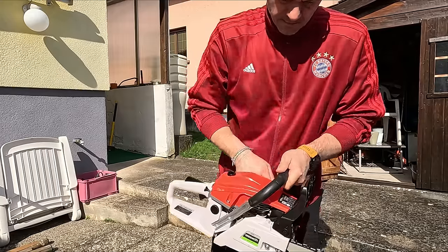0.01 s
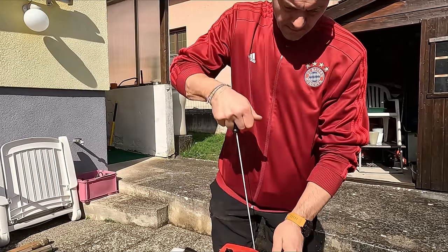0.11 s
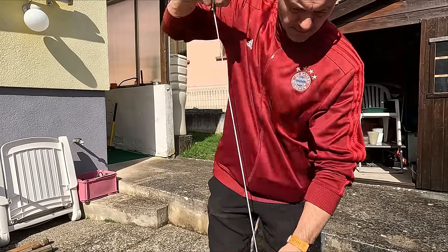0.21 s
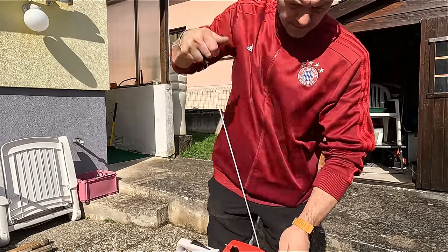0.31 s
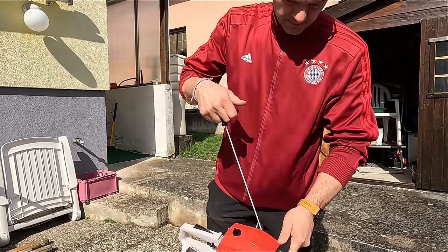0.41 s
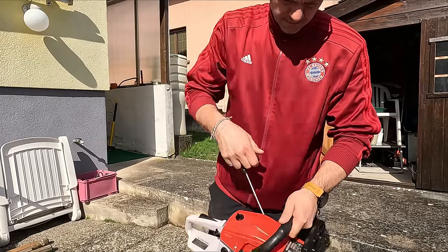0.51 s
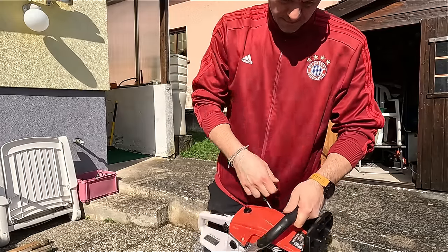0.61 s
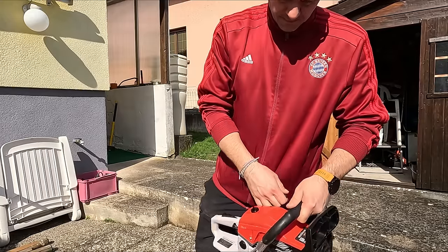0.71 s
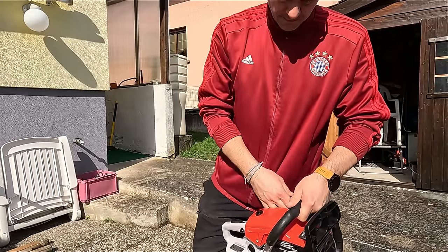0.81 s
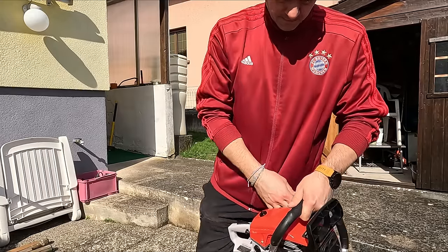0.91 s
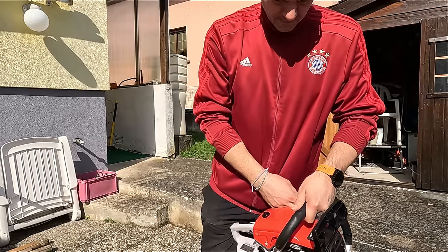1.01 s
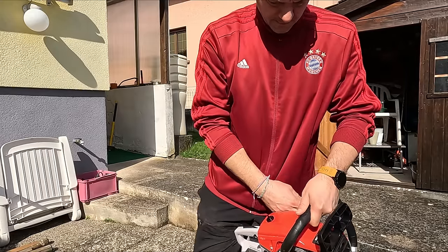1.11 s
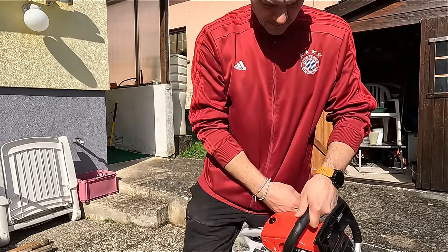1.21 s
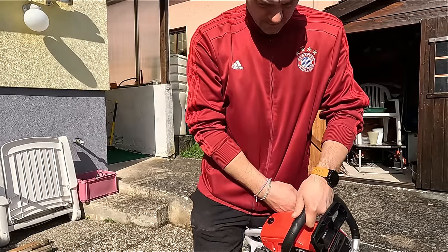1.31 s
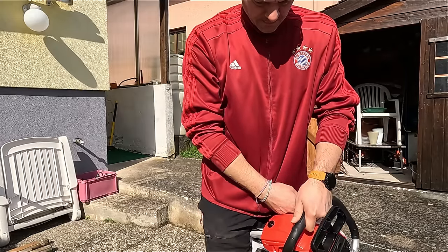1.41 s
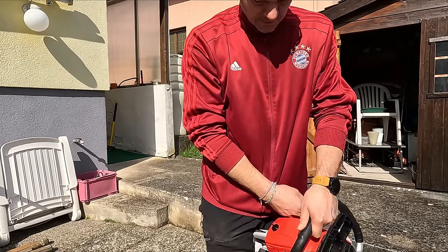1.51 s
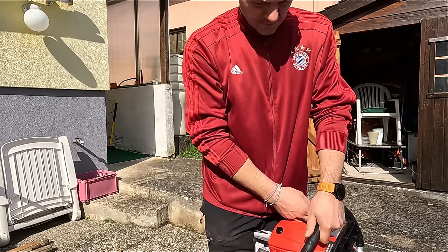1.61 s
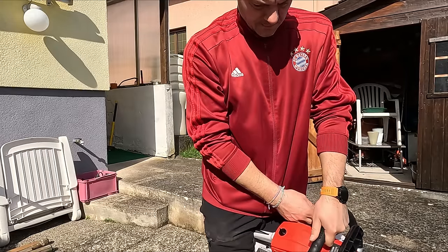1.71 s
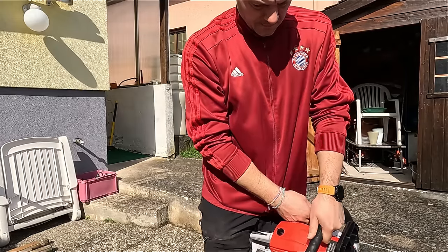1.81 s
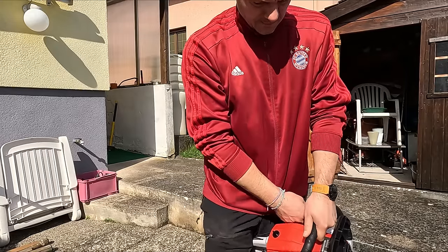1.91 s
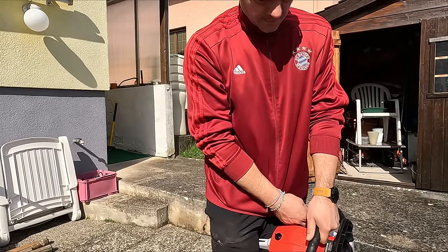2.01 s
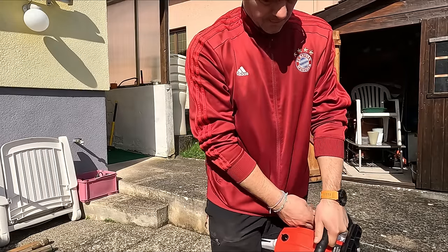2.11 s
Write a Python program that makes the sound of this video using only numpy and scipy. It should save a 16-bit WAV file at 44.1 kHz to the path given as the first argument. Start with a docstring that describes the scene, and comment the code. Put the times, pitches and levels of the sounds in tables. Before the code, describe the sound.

A chainsaw's starter cord is pulled once, close by in a yard. Light clacks lead into a whirr, and from 0.2 to 0.5 seconds the engine gives quick hollow puffs without catching. The cord rewinds until about 0.9 seconds while the plastic housing clacks and the chain chinks. Afterwards sleeves rustle faintly and a light breeze rumbles on the microphone. A small lever clicks at around 2 seconds.

```python
"""A light clack and the whirr of a cord: one pull on a chainsaw's starter in a yard. The piston pushes
a few hollow puffs through the ringing muffler, and the engine stops without catching. The spring winds
the cord back while the plastic housing clacks and the loose chain chinks on its steel bar.
Then sleeves rustle, a lever on the handle clicks, and a breeze rumbles on the microphone."""
import sys
import numpy as np
from scipy import signal
from scipy.fft import rfft, irfft, next_fast_len
from scipy.io import wavfile

SR = 44100
rng = np.random.default_rng(int(sys.argv[2]) if len(sys.argv) > 2 else 0)


def materialize(psi):
    """Save the field psi as 16-bit PCM at rate SR to the path in sys.argv[1].

    A 1-D psi becomes a single channel; in a 2-D psi each row is a channel.
    """
    bounded = np.clip(np.atleast_2d(psi).T, -1, 1)
    quanta = np.round(bounded * 32767).astype(np.int16)
    wavfile.write(sys.argv[1], SR, quanta)


N = 97020

# piston strokes (time [s], level [dB], pitch [Hz])
PUFFS = [(.209, -24.5, 523), (0.2307, -11.5, 263), (0.2617, -2, 232.6), (0.2897, -3, 239),
         (0.3142, -4, 247), (0.344, -4, 213.7), (0.3901, -8, 190.4), (0.409, -15, 205), (.4470, -11, 230.5),
         (.4870, -15.5, 104.6)]
# muffler ring (multiple of the pitch, level [dB], t60 [s])
MUFFLER_MODES = [(.57, -13.5, 0.12), (1, 1.5, 0.064), (1.17, -10.5, 0.081), (1.6, -14.5, 0.13),
                 (2.05, -7.5, 0.046), (3.3, -16.5, 0.019)]
# breath of escaping gas (frequency [Hz], level [dB])
GAS_EQ = [(60, -30), (160, -24), (320, 26), (550, 3), (900, -1), (2000, -65), (6000, -64)]
# the saw rocking in the hands (time [s], level [dB])
ROCK_ENV = [(.2, -67), (.33, -35), (.41, -26), (.5, -32), (.62, -33.5), (.68, -56), (.8, -74)]
# its low thud (frequency [Hz], level [dB])
ROCK_EQ = [(20, -13), (45, 6.5), (70, 9), (125, 3), (200, -6), (500, -46)]

# cord and pulley running (time [s], level [dB], treble lift and bass cut [dB])
WHIRR_ENV = [(0, -27.5, 2.5), (.05, -59, -18), (.095, -51, 3.5), (.16, -72, -8), (.19, -32, -6),
             (.23, -23.5, -5), (.27, -21.5, -0.5), (.33, -22.5, 1.5), (.37, -21, -2), (.395, -19, 3),
             (.43, -25.5, -5), (.48, -33.5, -5.5), (.53, -27.5, -4.5), (.6, -30.5, -1.5), (.69, -34.5, 3),
             (.74, -35.5, -7), (.785, -45.5, 1.5), (.88, -61, 0)]
# their friction (frequency [Hz], level [dB])
CORD_EQ = [(150, -9), (420, -12.5), (580, 6), (1000, -4), (1600, 3.5), (2700, -0.5), (4000, 0), (5800, -7),
           (8300, -9), (9600, -20.5), (12500, -30), (15500, -63)]
# the cord rubbing in its eyelet (time [s], level [dB])
RASP_ENV = [(.19, -55), (.225, -25), (.26, -22), (.3, -29.5), (.35, -35.5), (.45, -68)]
# its narrow rasp (frequency [Hz], level [dB])
RASP_EQ = [(1200, -31), (2000, 1), (2700, 4), (3200, -4), (4200, -41)]
# drone of the returning pulley (time [s], level [dB])
REWIND_ENV = [(.45, -61), (.52, -52), (.62, -33.5), (.72, -40.5), (.77, -66), (.83, -42), (.87, -62.5)]
# hollow starter cover (frequency [Hz], width [Hz], gain [dB])
COVER_MODES = [(600, 72, -6.5), (752, 120, -1), (1155, 45, -6)]

# knocks of starter and housing (time [s], level [dB], centre [Hz], t60 [s])
CLACKS = [(.0005, -34, 1480, 0.12), (0.1056, -16, 1660, .028), (0.113, -23, 5600, 0.046),
          (.1210, -21, 1710, 0.034), (0.169, -15, 2380, 0.029), (.179, -14.5, 2300, 0.022),
          (0.204, -20, 2700, 0.021), (0.239, -12.5, 2420, 0.0082), (0.2572, -13, 2510, 0.027),
          (0.281, -10.5, 2880, 0.01), (.3115, -14.5, 6760, 0.099), (0.3336, -14, 1660, 0.057),
          (0.3399, -11.5, 6600, 0.022), (0.3469, -14.5, 3770, 0.021), (0.3924, -11, 6940, 0.026),
          (0.4098, -11, 4200, 0.017), (.4215, -28, 7300, 0.077), (.5266, -16.5, 1760, 0.034),
          (.5434, -16, 1120, .04), (0.569, -22.5, 1830, 0.039), (.5968, -19.5, 1700, .035),
          (.6290, -18.5, 1400, 0.028), (.6660, -20.5, 1080, 0.05), (0.666, -21.5, 5800, 0.035),
          (0.7135, -24.5, 1410, 0.014), (.7160, -20.5, 5940, 0.034), (.7980, -19.5, 2940, 0.05),
          (0.8096, -20.5, 3330, 0.039)]
# tone of knocked plastic (frequency [Hz], level [dB])
PLASTIC_EQ = [(100, -21), (400, -18), (700, 8.5), (1500, 1), (3200, 4), (5000, -6), (8500, -10.5),
              (11000, -34), (15000, -44)]
# body of the housing (frequency [Hz], width [Hz], gain [dB])
HOUSING_MODES = [(584, 35, -5.5), (748, 14, 3), (1102, 38, 5), (1482, 19, 0), (1770, 130, -13),
                 (2190, 54, -12), (2600, 54, -11), (2790, 13, -25), (3320, 115, -3)]

# loose chain hitting the bar (time [s], level [dB], tilt [dB/octave], boosted frequency [Hz])
CHINKS = [(.0005, -31.5, 2.5, 5240), (0.11, -25.5, -2, 11000), (0.177, -22.5, -2.5, 5165),
          (0.384, -11.5, -7, 4230), (0.4195, -16, -12, 4140), (.5050, -34.5, -1, 10850),
          (.5270, -31, 14, 7885), (0.547, -34, 4, 8450), (.5695, -28, 1, 7760), (.5760, -31, 2, 4352),
          (0.63, -25, -1.5, 4300), (.6680, -24, -3, 4470), (.7200, -20.5, -4, 4490),
          (.7260, -26, -3.5, 5165), (0.811, -28, -3, 8280)]
# ring of the steel bar (frequency [Hz], level [dB], t60 [s])
BAR_MODES = [(3620, -11, .15), (3838, -10, .16), (4240, -4, .06), (4350, 3, .09), (4673, -10, .09),
             (5174, -2, .055), (7050, -8, .045), (7885, -4, .085), (8748, -14, .11), (9055, -14, .12),
             (10240, -21, .09), (10620, -17, .08), (10770, -15, .1), (11010, -21, .09), (13300, -26, .08)]
# the chain shivering (time [s], level [dB])
JINGLE_ENV = [(.36, -70), (.39, -24), (.43, -25), (.47, -54), (.54, -31.5), (.59, -30), (.65, -36),
              (.76, -75)]

# lever contacts (time [s], level [dB], t60 [s], hollow ring [dB])
CLICKS = [(0.9356, -41.5, 0.018, -8), (0.961, -45, 0.057, 5.5), (1.9870, -26, 0.013, -25),
          (1.9964, -33, 0.021, -7), (2.001, -31.5, 0.057, 3), (2.0745, -33.5, 0.015, -8),
          (2.0890, -34, 0.069, -17), (2.0990, -36.5, 0.032, -23)]
# tone of the lever's snap (frequency [Hz], level [dB])
LEVER_EQ = [(200, -10), (800, -3.5), (1600, -3), (2600, 4), (3100, 1.5), (4300, -17), (9000, -18.5),
            (14000, -52)]
# its hollow ring (frequency [Hz], width [Hz], gain [dB])
LEVER_MODES = [(1186, 28, 0)]

# sleeves rustling (time [s], level [dB])
SLEEVE_ENV = [(0, -46), (.9, -56.5), (.98, -56.5), (1.1, -49), (1.19, -57.5), (1.24, -49.5), (1.28, -46.5),
              (1.4, -51.5), (1.53, -48), (1.58, -56), (1.76, -54.5), (1.82, -50.5), (1.88, -56.5),
              (1.95, -46), (2.02, -47), (2.2, -48.5)]
# tone of the cloth (frequency [Hz], level [dB])
SLEEVE_EQ = [(300, -23), (1200, 9.5), (3000, 6), (6000, -3), (8700, -6.5), (10000, -25), (13000, -25),
             (15500, -50)]
# quick sleeve strokes (time [s], level [dB], half length [s])
SWISHES = [(0.982, -54, 0.03), (1.057, -60, 0.018), (1.233, -47.5, 0.017), (1.34, -56.5, 0.036),
           (1.512, -56, 0.022)]
# their hiss (frequency [Hz], level [dB])
SWISH_EQ = [(1000, -11), (3500, -7), (5300, -1.5), (8500, -8), (10000, -18), (13000, -29), (15500, -34)]
# gusts (time [s], level [dB])
BREEZE_ENV = [(0.68, -39.5), (0.688, -49), (0.856, -35), (0.916, -46), (0.976, -37.5), (1.25, -47),
              (1.326, -41.5), (1.37, -49), (1.446, -28), (1.572, -38.5), (1.742, -32.5), (1.784, -45.5),
              (1.894, -31.5), (1.984, -47), (1.988, -50), (2.114, -39), (2.182, -34.5), (2.2, -61)]
# their rumble (frequency [Hz], level [dB])
BREEZE_EQ = [(12, -5), (28, 0), (60, -6), (100, -11), (180, -30.5), (400, -71), (1500, -75)]
# open-air bed (time [s], level [dB])
AIR_ENV = [(0, -47), (.9, -54), (1.4, -48), (1.85, -48), (2.2, -45)]
# its tone (frequency [Hz], level [dB])
AIR_EQ = [(60, -5), (150, 2), (300, -5), (450, -6.5), (700, -6.5), (1200, -5.5), (1700, -12), (2700, -46),
          (7200, -31.5), (10000, -38.5), (15000, -62)]

# stereo image of the background (frequency [Hz], left-right correlation)
CORRELATION = [(30, 0.68), (120, 1), (1000, 0.57), (4000, 0.8), (9000, 1), (13000, 1)]
# reflections off near surfaces (frequency [Hz], side level [dB])
SIDE_EQ = [(100, -51), (250, -61), (600, -26), (1200, -19), (2500, -19.5), (5000, -13), (9000, -67),
           (13000, -17)]
# tail from the walls (frequency [Hz], t60 [s])
WALL_DECAY = [(150, 0.049), (700, 0.55), (3000, 0.14), (10000, 0.052)]
# pan (frequency [Hz], left minus right [dB])
BALANCE = [(60, -0.7), (250, -1.1), (800, -0.4), (4000, -1.1), (8000, -0.8), (12000, 3)]
# phase between the sides (frequency [Hz], lag of the left [rad])
LEFT_LAG = [(200, 0.26), (1000, 0.08), (2500, 0.45), (4300, 0.73), (8000, 0.32), (12000, 1)]


def amp(db):
    """Decibels to gain."""
    return 10 ** (np.asarray(db) / 20)


def unit(x):
    """Scale to rms 1."""
    return x / np.sqrt(np.mean(x ** 2) + 1e-20)


def along(points, hz):
    """Read (frequency, value) points on a log axis."""
    f, v = np.transpose(points)
    return np.interp(np.log(hz + 1), np.log(f + 1), v)


def curves(rows):
    """One value per sample for each column after the time."""
    times, *columns = np.transpose(rows)
    return [np.interp(np.arange(N) / SR, times, column) for column in columns]


def fader(rows):
    """Gain per sample from (time, level) points."""
    return amp(curves(rows)[0])


def fade(t, t60):
    """Exponential decay, 60 dB down at t60."""
    return np.exp(-np.log(1000) * t / t60)


def rise(t, attack_s):
    """Exponential attack."""
    return 1 - np.exp(-t / attack_s)


def bell(offset, width):
    """Gaussian bump of height 1."""
    return np.exp(-.5 * (offset / width) ** 2)


def add(track, s, sound):
    """Mix a sound into the track at time s."""
    i = max(0, round(s * SR))
    track[i:i + len(sound)] += sound[:N - i]


def filtered(x, response):
    """Apply a frequency response."""
    size = next_fast_len(x.shape[-1] + SR // 8)
    hz = np.fft.rfftfreq(size, 1 / SR)
    return irfft(rfft(x, size) * response(hz), size)[..., :x.shape[-1]]


def equalise(x, eq):
    """Apply a (frequency, level) curve."""
    return filtered(x, lambda hz: amp(along(eq, hz)))


def noise(eq, size=N):
    """Coloured noise of rms 1."""
    return unit(equalise(rng.standard_normal(size), eq))


def wide_noise(eq):
    """Coloured stereo noise whose width varies with frequency."""
    def mid_side(hz):
        angle = np.arccos(along(CORRELATION, hz)) / 2
        return amp(along(eq, hz)) * [np.cos(angle), np.sin(angle)]
    mid, side = filtered(rng.standard_normal((2, N)), mid_side)
    return unit(np.array([mid + side, mid - side]))


def resonate(x, modes):
    """Pass x through parallel band-pass resonators."""
    return filtered(x, lambda hz: sum(amp(db) * 1j * hz * width / (centre**2 - hz**2 + 1j * hz * width)
                                      for centre, width, db in modes))


def ringing(hz, level_db, t60, t):
    """Decaying modes that start at rms 1 together."""
    gain = amp(level_db)
    waves = fade(t, t60) * np.sin(2 * np.pi * (hz * t + rng.random(hz.shape)))
    return np.sqrt(2) * (gain / np.linalg.norm(gain) * waves).sum(0)


def engine(gas_db=-9, gas_lead_s=.003, low_cut_hz=128):
    """Each piston stroke pushes a puff of gas through the ringing muffler; the saw rocks underneath."""
    puffs, t = np.zeros(N), np.arange(SR // 5) / SR
    for s, db, hz in PUFFS:
        ring = sum(amp(level) * fade(t, t60) * np.sin(2 * np.pi * hz * ratio * t)
                   for ratio, level, t60 in MUFFLER_MODES)
        add(puffs, s, amp(db) * ring * rise(t, attack_s=.00038))
        gas = noise(GAS_EQ, len(t)) * fade(t, t60=.055) * rise(t, gas_lead_s)
        add(puffs, s - gas_lead_s, amp(db + gas_db) * gas)
    low_cut = signal.butter(2, low_cut_hz, "highpass", fs=SR, output="sos")
    return signal.sosfilt(low_cut, puffs) + fader(ROCK_ENV) * noise(ROCK_EQ)


def starter(ticks_per_s=550, tick_share=.45, pivot_hz=2500):
    """Cord and pulley rub and tick, brighter when running fast; the cord rasps in its eyelet."""
    level_db, tilt_db = curves(WHIRR_ENV)
    ticks = unit((rng.random(N) < ticks_per_s / SR) * rng.choice([-1, 1], N))
    friction = np.sqrt(tick_share) * ticks + np.sqrt(1 - tick_share) * rng.standard_normal(N)
    rub = unit(equalise(friction, CORD_EQ))
    lows = filtered(rub, lambda hz: 1 / (1 + (hz / pivot_hz) ** 2))
    whirr = lows * amp(-tilt_db) + (rub - lows) * amp(tilt_db)
    return amp(level_db) * whirr + fader(RASP_ENV) * noise(RASP_EQ)


def rewind():
    """The spring winds the cord in, and the pulley drones in the hollow starter cover."""
    return fader(REWIND_ENV) * unit(resonate(noise(CORD_EQ), COVER_MODES))


def clacks(peak_db=12.5, peak_octaves=.23):
    """Plastic parts knock: short noise bursts, each with one broad resonance."""
    out, t = np.zeros(N), np.arange(SR // 8) / SR
    for s, db, centre, t60 in CLACKS:
        def colour(hz):
            peak = peak_db * bell(np.log2((hz + 1) / centre), peak_octaves)
            return amp(along(PLASTIC_EQ, hz) + peak)
        burst = unit(filtered(rng.standard_normal(len(t)), colour))
        add(out, s, amp(db) * burst * fade(t, t60) * rise(t, attack_s=.00013))
    return out


def housing(x, trim_db=-3):
    """Whatever knocks or rubs on the plastic housing rings its resonances."""
    return amp(trim_db) * (x + resonate(x, HOUSING_MODES))


def chinks(boost_db=14.5, boost_octaves=.035, scatter_db=3, link_db=-9.5, link_db_per_octave=-5.5):
    """Each knock rings the steel bar, one narrow band boosted, and chain links at chance pitches."""
    out, t = np.zeros(N), np.arange(SR // 5) / SR
    hz, level, t60 = np.transpose(BAR_MODES)[:, :, None]
    for s, db, tilt, boosted_hz in CHINKS:
        mode_db = level + tilt * np.log2(hz / hz.mean())
        mode_db += boost_db * bell(np.log2(hz / boosted_hz), boost_octaves)
        mode_db += scatter_db * rng.standard_normal(hz.shape)
        bar = ringing(hz, mode_db, t60, t)
        link_hz = rng.uniform(3200, 14000, size=(40, 1))
        slope_db = (link_db_per_octave + tilt) * np.log2(link_hz / hz.mean())
        links = ringing(link_hz, slope_db, t60=.1, t=t)
        add(out, s, amp(db) * (bar + amp(link_db) * links) * rise(t, attack_s=.0013))
    return out


def jingle(contacts_per_s=450):
    """The chain shivers on the bar: many light contacts keep the steel ringing between the knocks."""
    hz, level, t60 = np.transpose(BAR_MODES)[:, :, None]
    ring = ringing(hz, level, t60, np.arange(SR // 5) / SR)
    contacts = unit((rng.random(N) < contacts_per_s / SR) * rng.standard_normal(N))
    return signal.fftconvolve(fader(JINGLE_ENV) * contacts, ring / np.linalg.norm(ring))[:N]


def lever():
    """A small lever on the handle snaps over and settles; some contacts ring hollow."""
    out, t = np.zeros(N), np.arange(SR // 8) / SR
    for s, db, t60, hollow_db in CLICKS:
        snap = noise(LEVER_EQ, len(t))
        hollow = amp(hollow_db) * unit(resonate(snap, LEVER_MODES))
        add(out, s, amp(db) * (snap + hollow) * fade(t, t60) * rise(t, attack_s=.000075))
    return out


def sleeves():
    """Cloth rubs in a soft rustle with a few quick swishes."""
    t = np.arange(N) / SR
    strokes = sum(amp(db) * bell(t - s, half_length) for s, db, half_length in SWISHES)
    return fader(SLEEVE_ENV) * wide_noise(SLEEVE_EQ) + strokes * wide_noise(SWISH_EQ)


def breeze():
    """Gusts rumble on the microphone over a quiet bed of open air."""
    return fader(BREEZE_ENV) * wide_noise(BREEZE_EQ) + fader(AIR_ENV) * wide_noise(AIR_EQ)


def yard(x, near_t60=.12, walls_db=-20):
    """Near surfaces widen the treble a little and the walls add a short tail."""
    hz, t, bands = signal.stft(rng.standard_normal((2, SR // 2)), SR, nperseg=256)
    bands *= fade(t, along(WALL_DECAY, hz)[:, None])
    _, tail = signal.istft(bands, SR, nperseg=256)
    size = tail.shape[1]
    near = rng.standard_normal(size) * fade(np.arange(size) / SR, near_t60)
    side = equalise(signal.fftconvolve(x, near / np.linalg.norm(near))[:N], SIDE_EQ)
    walls = signal.fftconvolve(x[None], tail / np.linalg.norm(tail[0]), axes=1)[:, :N]
    return np.array([x + side, x - side]) + amp(walls_db) * walls


def scene():
    """The saw in the yard, its steel close and dry; the whole mix leans slightly right."""
    saw = engine() + rewind() + housing(clacks() + starter()) + lever()
    mix = yard(saw) + chinks() + jingle() + sleeves() + breeze()
    sides = np.array([[.5], [-.5]])
    pan = lambda hz: amp(sides * along(BALANCE, hz)) * np.exp(-1j * sides * along(LEFT_LAG, hz))
    return filtered(mix, pan)


def record(dry, top_hz=15750):
    """Clip at full scale, then cut everything above the band limit."""
    return filtered(np.clip(dry, -1, 1), lambda hz: hz < top_hz)


dry = scene()
out = record(dry)
materialize(out)
```